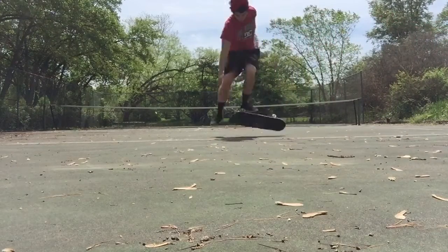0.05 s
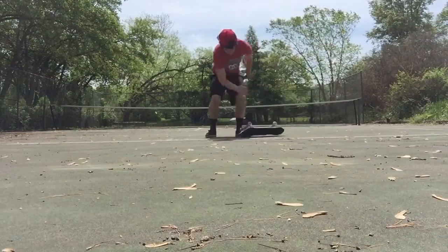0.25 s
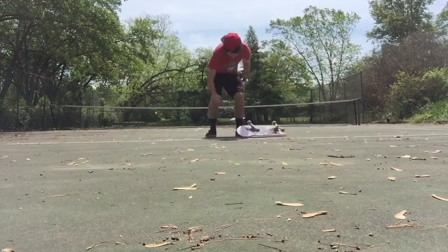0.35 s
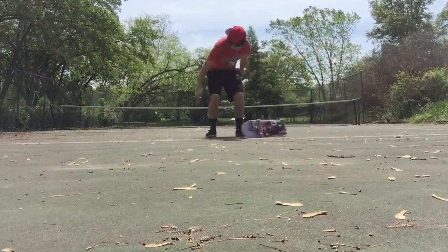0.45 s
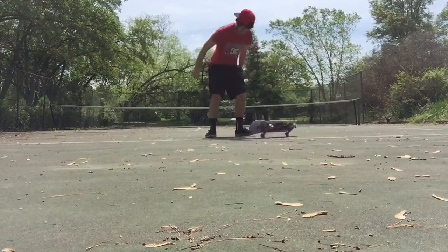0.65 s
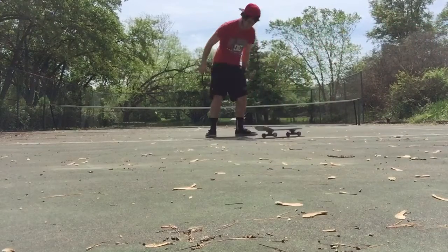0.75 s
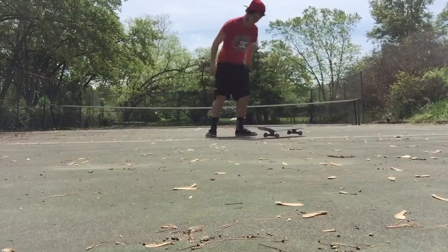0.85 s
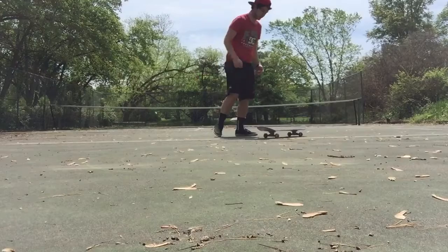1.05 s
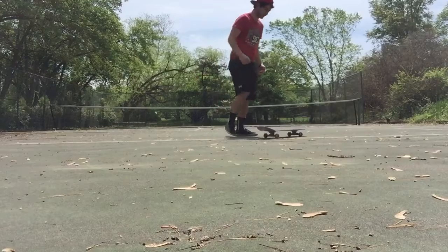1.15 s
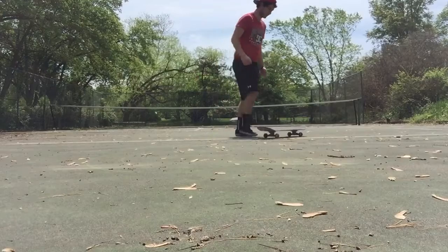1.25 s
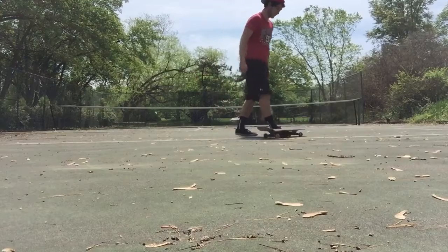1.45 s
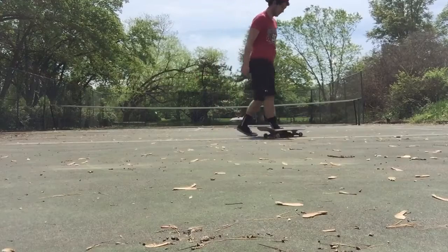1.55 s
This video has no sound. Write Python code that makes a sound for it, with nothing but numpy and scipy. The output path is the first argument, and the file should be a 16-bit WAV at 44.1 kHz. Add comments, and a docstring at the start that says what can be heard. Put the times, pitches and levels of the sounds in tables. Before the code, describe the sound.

A skateboard slaps down hard twice, scrapes over and rattles onto its wheels.

```python
"""Outdoor hard court: a skateboard lands from a flip and slaps down twice, overloading the microphone.
It tips over its edge, scrapes and drops onto its wheels, which bounce and rattle. Each blow rings the
deck and steel trucks; a low thump lies under both slaps; scrape and rattle are dense tiny contacts.
Fence and trees return a short tail. Under it: tree hiss, distant rumble and hum, one far bird note."""
import sys
import numpy as np
from scipy import signal
from scipy.fft import rfft, irfft
from scipy.io import wavfile

SR = 44100
rng = np.random.default_rng(int(sys.argv[2]) if len(sys.argv) > 2 else 0)


def output_pcm(signal):
    """Save a mono or channel-first signal as 16-bit PCM at the path in sys.argv[1].

    Samples are clipped to [-1, 1] before scaling.
    """
    pcm = np.clip(np.atleast_2d(signal).T, -1, 1) * 32767
    wavfile.write(sys.argv[1], SR, np.round(pcm).astype(np.int16))


N = 70560
T = np.arange(N) / SR

# tree hiss before its high-pass: (frequency [Hz], relative density [dB])
HISS_SPECTRUM = [(300, 7.5), (420, -15), (700, -14.5), (1200, -9), (1600, -14), (2100, -10.5), (2800, -18),
                 (3600, -16.5), (4500, -28.5), (6500, -31.5), (9000, -42), (15500, -46)]
# distant rumble: (frequency [Hz], relative density [dB])
RUMBLE_SPECTRUM = [(25, -30), (45, -7.5), (75, 3), (130, 5.5), (200, -3), (300, -7.5), (450, -24),
                   (1000, -32), (15000, -90)]
# distant rumble: (time [s], level [dB])
RUMBLE_ENVELOPE = [(0, -40), (.3, -43.5), (.55, -50), (.85, -41.5), (1.25, -46), (1.42, -38), (1.6, -42.5)]
# distant hum: (frequency [Hz], rms level [dB])
HUM_TONES = [(75, -55), (113, -50.5), (134, -53), (180, -51.5)]
# court tail: (frequency [Hz], relative gain [dB])
TAIL_SPECTRUM = [(100, -37), (300, -11), (700, -3), (1200, -2), (2000, -8), (4000, -2), (8000, -1.5),
                 (15000, 10.5)]
# court tail: (frequency [Hz], t60 [s])
TAIL_DECAY = [(100, .5), (700, 1), (2000, 0.6), (5000, 0.43), (12000, 0.49)]
# wheels and loose hardware: (time [s], level [dB])
RATTLE_ENVELOPE = [(0, -112), (.885, -56.5), (.905, -26), (.945, -35.5), (.965, -34.5), (.995, -46.5),
                   (1.015, -33.5), (1.05, -38.5), (1.1, -39.5), (1.17, -62), (1.6, -102)]
# wheels and loose hardware: (frequency [Hz], relative density [dB])
RATTLE_SPECTRUM = [(100, -25), (600, 1.5), (1200, 2), (2200, 2), (3000, -7.5), (4000, -2.5), (5500, -16.5),
                   (8000, -13.5), (10000, -26.5), (15000, -25)]
# edge scrape: (time [s], level [dB])
SCRAPE_ENVELOPE = [(0, -43.5), (.025, -39), (.045, -52.5), (.18, -48.5), (.25, -31.5), (.33, -30),
                   (.38, -33), (.5, -47.5), (.555, -30.5), (.6, -38.5), (.63, -45), (.655, -26),
                   (.675, -36.5), (.695, -35), (.73, -49.5), (1.6, -73)]
# edge scrape: (frequency [Hz], relative density [dB])
SCRAPE_SPECTRUM = [(100, -4), (300, -6), (700, 2), (1300, 4), (2100, 0.5), (3000, -10.5), (5000, -24),
                   (8000, -28), (15000, -44)]
# low thumps under the landing and the slam: (time [s], level [dB], frequency [Hz], rise [s])
LOW_THUMPS = [(.245, -26.5, 86.6, 0.013), (.342, -22, 50, 0.0037)]
# truck steel resonances: (frequency [Hz], bandwidth [Hz], gain [dB])
TRUCK_RESONANCES = [(7350, 18, -6.5), (7730, 50, 1.5), (11700, 80, 7), (11900, 73, -8)]
# dense, fast-dying part of a blow: (frequency [Hz], relative density [dB])
SLAP_SPECTRUM = [(60, -15), (170, -22), (280, -37), (380, -4.5), (650, 4), (850, -8.5), (1150, 0.5),
                 (1480, -4.5), (2000, 2.5), (2800, -10), (4000, -4), (5000, -21.5), (6300, -13),
                 (8000, -18), (10000, -28.5), (15000, -30)]
# slap decay: (frequency [Hz], base t60 [s])
SLAP_DECAY = [(100, 0.02), (600, 0.073), (2000, 0.051), (5000, 0.043), (12000, 0.037)]
# contact names, in the order of the mode gain columns
CONTACT_KINDS = ["landing", "slam", "edge", "wheels"]
# deck and truck modes: (frequency [Hz], base t60 [s], landing [dB], slam [dB], edge [dB], wheels [dB])
BOARD_MODES = [(186, 0.17, -36.5, -43.5, -41, -14), (272.6, 0.062, -20, -15, -11.5, -24),
               (315.2, .12, -13, -16, -12.5, -13.5), (377, 0.066, -14.5, -19.5, -21, -13),
               (524, 0.16, -15.5, -23.5, -14.5, -45), (596.7, 0.064, -18, -9, -12, -7.5),
               (676, 0.072, -9.5, -3.5, -7.5, -7.5), (947, 0.13, -19, -27.5, -32, -38),
               (1110, .09, -6.5, -32, -14.5, -20), (1230, 0.11, -30, -21, -21, -17.5),
               (1379, 0.082, -30, -27, -15, -23), (1618, .075, -23, -17, -13, -7),
               (1707, 0.073, -13.5, -11, -12.5, -14), (1830, 0.095, -28, -15.5, -17.5, -32),
               (1947.6, 0.097, -14.5, -14, -13, -10), (2192, 0.2, -37.5, -32, -26, -18.5),
               (3722, 0.068, -21, -29.5, -31, -35)]
# blow EQ points: (thump [Hz], knock [Hz], midrange [Hz], clack [Hz], crack [Hz], sizzle [Hz])
BLOW_EQ_HZ = [310, 690, 1150, 2050, 4300, 11000]
# board blows, EQ re midrange: (time [s], contact, level [dB], thump [dB], knock [dB], clack [dB],
# crack [dB], sizzle [dB], t60 factor)
BOARD_BLOWS = [(.1953, "landing", -15.5, 5, 1, 0.5, -1.5, -10.5, 1.32),
               (.2228, "landing", -8.5, 3.5, -1, -13, 13, 5, 0.35),
               (.2250, "landing", -6, -3.5, -4.5, 8.5, -47, -22, 1.32),
               (.2330, "landing", 4, 2.5, -3, -2.5, 1.5, -10.5, 0.65),
               (.3440, "slam", 4.5, -5, 1, 1.5, -1, -7.5, 0.51),
               (.4068, "slam", -22.5, 3.5, -0.5, 1, -5, -6, 0.74),
               (.5158, "edge", -19.5, -6, -0.5, -5, -15, -4, 0.48),
               (0.5384, "edge", -28, 4, 2, 9.5, -18, 10, 0.74),
               (.5472, "edge", -14.5, -5.5, 5, 3, -11.5, -6.5, 0.66),
               (0.6267, "edge", -21.5, 3, 1, -2, -1.5, 6, 0.8),
               (0.6311, "edge", -11, 1.5, -11, 5, -12.5, -6.5, 0.78),
               (0.688, "edge", -25.5, -4.5, -17, 2.5, -9, -13, 1.26),
               (.8942, "wheels", -11.5, 0, -11, -3, -2.5, 3, 1.06),
               (.9015, "wheels", -25, 4.5, 22, -28, -3, -8, 0.9),
               (.9610, "wheels", -33.5, -4, -1, -1, 4, 10.5, 1.5),
               (1.0020, "wheels", -40.5, -4, 4, -7, 14, 13, 0.87),
               (1.0097, "wheels", -31, -3, 3, -10, 12, 8, 0.96),
               (1.0258, "wheels", -19, 1, -8, 4.5, 5, 9.5, 0.82),
               (1.0310, "wheels", -23.5, -19, 18.5, -6, -1, -7, 0.56)]

HISS_DB, HUM_WAVER_RAD = -49.5, 0.3
TAIL_DB, TAIL_RISE_S = -19, 0.004
GRAINS_PER_S, GRAIN_SPREAD_DB = 2000, 2
SLAP_DB, ATTACK_S, MODE_SCATTER_DB = -3, 0.0005, 1
AFTER_RING_DB, AFTER_RING_T60_FACTOR = -30.5, 4.5
CLIP_LEVEL, CUTOFF_HZ = 1.0, 15800


def from_db(db):
    """Decibels to gain."""
    return 10 ** (np.asarray(db) / 20)


def unit_rms(x):
    """Scale to rms 1."""
    return x / np.sqrt(np.mean(x ** 2) + 1e-20)


def envelope(rows):
    """Gain along (time [s], level [dB])."""
    return from_db(np.interp(T, *np.transpose(rows)))


def at_hz(rows, hz):
    """Interpolate over log frequency."""
    row_hz, value = np.transpose(rows)
    return np.interp(np.log(np.maximum(hz, 1)), np.log(row_hz), value)


def coloured(x, spectrum):
    """Apply a spectrum; rms 1."""
    bin_hz = np.arange(N // 2 + 1) * SR / N
    return unit_rms(irfft(rfft(x) * from_db(at_hz(spectrum, bin_hz)), N))


def smooth(x, tau_s):
    """One-pole lag."""
    pole = np.exp(-1 / (tau_s * SR))
    return signal.lfilter([1 - pole], [1, -pole], x + 1e-18)


def third_octaves(start_hz, count):
    """Yield (centre [Hz], width [Hz], band-pass)."""
    edges = start_hz * 2 ** (np.arange(count + 1) / 3)
    for lo, hi in zip(edges, edges[1:]):
        yield np.sqrt(lo * hi), hi - lo, signal.butter(2, [lo, hi], "band", fs=SR, output="sos")


def noise_bands():
    """Independent noise bands, evened envelopes, flat per Hz: (centre [Hz], signal)."""
    bands = []
    for hz, width_hz, sos in third_octaves(start_hz=40, count=26):
        analytic = signal.hilbert(signal.sosfilt(sos, rng.standard_normal(N + SR)))
        evened = signal.sosfilt(sos, np.cos(np.angle(analytic)))[SR:]
        bands.append((hz, evened * np.sqrt(width_hz / SR)))
    return bands


def tree_hiss():
    """Faint steady noise from the trees."""
    highpass = signal.butter(2, 300, "high", fs=SR, output="sos")
    hiss = signal.sosfilt(highpass, coloured(rng.standard_normal(N), HISS_SPECTRUM))
    return from_db(HISS_DB) * unit_rms(hiss)


def distant_hum():
    """Low tones, each wavering slowly in phase."""
    out = np.zeros(N)
    for hz, db in HUM_TONES:
        waver = coloured(rng.standard_normal(N), spectrum=[(3, 0), (12, -24), (100, -100)])
        out += from_db(db) * np.sqrt(2) * np.sin(2 * np.pi * hz * T + HUM_WAVER_RAD * waver)
    return out


def distant_rumble():
    """Low noise that swells and sinks."""
    return envelope(RUMBLE_ENVELOPE) * coloured(rng.standard_normal(N), RUMBLE_SPECTRUM)


def far_bird(start_s=1.56, length_s=0.05, hz=5780, db=-58):
    """One thin, faint note."""
    arch = np.sin(np.pi * np.clip((T - start_s) / length_s, 0, 1))
    return from_db(db) * arch * np.sin(2 * np.pi * hz * T)


def court_tail(x):
    """Fence and trees scatter each band's energy into a diffuse, dying tail."""
    out = np.zeros(N)
    for hz, _, sos in third_octaves(start_hz=100, count=22):
        incident = smooth(signal.sosfilt(sos, x + 1e-18) ** 2, TAIL_RISE_S)
        energy = smooth(incident, at_hz(TAIL_DECAY, hz) / np.log(1e6))
        diffuse = unit_rms(signal.sosfilt(sos, rng.standard_normal(N)))
        out += from_db(TAIL_DB + at_hz(TAIL_SPECTRUM, hz)) * np.sqrt(energy) * diffuse
    return out


def tiny_contacts(levels, spectrum):
    """Scrape or rattle: dense random impulses of uneven size."""
    sizes = from_db(GRAIN_SPREAD_DB * np.minimum(rng.exponential(1, N), 4))
    signs = rng.choice([-1, 1], N)
    hits = rng.random(N) < GRAINS_PER_S / SR
    return envelope(levels) * coloured(sizes * signs * hits, spectrum)


def add(out, start_s, x):
    """Mix x in at start_s."""
    i = int(start_s * SR)
    out[i:i + len(x)] += x[:N - i]


def low_thumps():
    """Short low sine pulses under the landing and the overloading slam."""
    out = np.zeros(N)
    for start_s, db, hz, rise_s in LOW_THUMPS:
        swell = T / rise_s * np.exp(1 - T / rise_s)
        add(out, start_s, from_db(db) * swell * np.sin(2 * np.pi * hz * T))
    return out


def truck_ping(blows):
    """Blows drive narrow, high resonances of the steel trucks."""
    return sum(from_db(db) * signal.lfilter(*signal.iirpeak(hz, hz / width_hz, fs=SR), blows + 1e-18)
               for hz, width_hz, db in TRUCK_RESONANCES)


def board_ring(t, contact, eq, t60_factor):
    """Struck deck and truck modes: fast decay plus a soft, longer after-ring."""
    hz, t60_s, *contact_db = np.transpose(BOARD_MODES)
    scatter_db = MODE_SCATTER_DB * rng.standard_normal(len(hz))
    gains = from_db(contact_db[CONTACT_KINDS.index(contact)] + at_hz(eq, hz) + scatter_db)
    signs = (-1) ** np.arange(len(hz))
    nepers = np.log(1000) * np.outer(1 / (t60_s * t60_factor), t)
    decay = np.exp(-nepers) + from_db(AFTER_RING_DB) * np.exp(-nepers / AFTER_RING_T60_FACTOR)
    return (gains * signs) @ (np.sin(2 * np.pi * np.outer(hz, t)) * decay)


def board_blows():
    """Board hits the court: ringing modes plus a noise slap, with EQ and decay set per blow."""
    out, t, bands = np.zeros(N), T[:SR // 2], noise_bands()
    slap_rms = np.std(sum(from_db(at_hz(SLAP_SPECTRUM, hz)) * band for hz, band in bands))
    for start_s, contact, db, thump, knock, clack, crack, sizzle, t60_factor in BOARD_BLOWS:
        eq = list(zip(BLOW_EQ_HZ, (thump, knock, 0, clack, crack, sizzle)))
        ring = board_ring(t, contact, eq, t60_factor)
        slap = np.zeros(len(t))
        for hz, band in bands:
            gain = from_db(SLAP_DB + at_hz(SLAP_SPECTRUM, hz) + at_hz(eq, hz)) / slap_rms
            decay = np.exp(-np.log(1000) * t / (at_hz(SLAP_DECAY, hz) * t60_factor))
            slap += gain * decay * band[int(start_s * SR):][:len(t)]
        attack = 1 - np.exp(-t / ATTACK_S)
        add(out, start_s, from_db(db) * (ring + slap) * attack)
    return out


def scene():
    """Mono mix; blows and thumps drive the truck ping and court tail."""
    blows = board_blows() + low_thumps()
    tail = court_tail(blows)
    scrape = tiny_contacts(SCRAPE_ENVELOPE, SCRAPE_SPECTRUM)
    rattle = tiny_contacts(RATTLE_ENVELOPE, RATTLE_SPECTRUM)
    background = tree_hiss() + distant_hum() + distant_rumble() + far_bird()
    return (background + tail + scrape + rattle + truck_ping(blows) + blows)[None]


def record(dry):
    """Microphone overload soft-clips the hardest slaps; a steep low-pass follows."""
    clipped = dry / (1 + (dry / CLIP_LEVEL) ** 6) ** (1 / 6)
    lowpass = signal.ellip(12, 0.1, 80, CUTOFF_HZ, fs=SR, output="sos")
    return signal.sosfilt(lowpass, clipped)


dry = scene()
out = record(dry)
output_pcm(out)
```